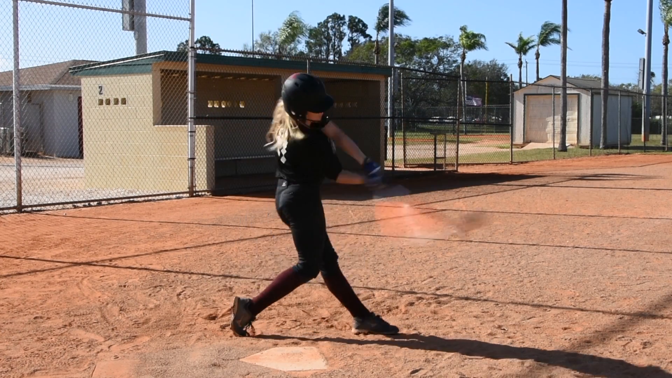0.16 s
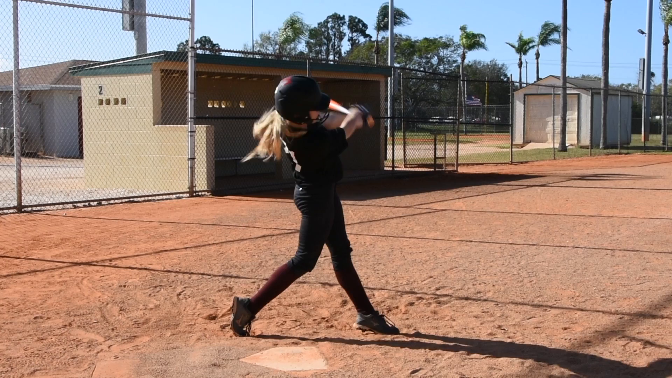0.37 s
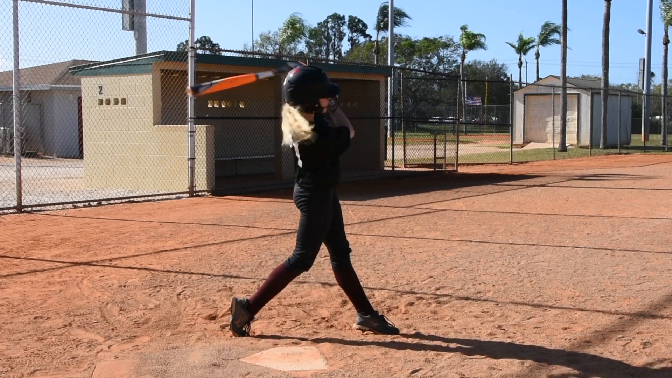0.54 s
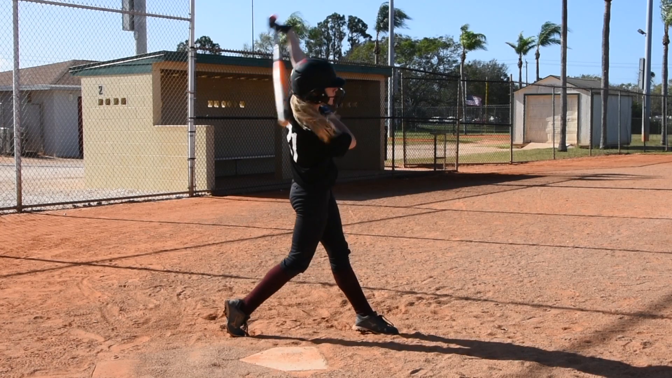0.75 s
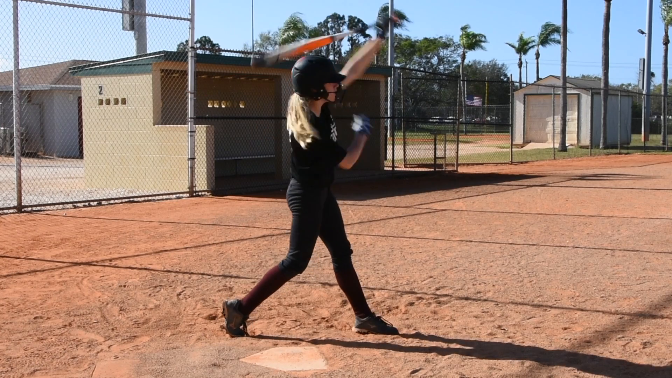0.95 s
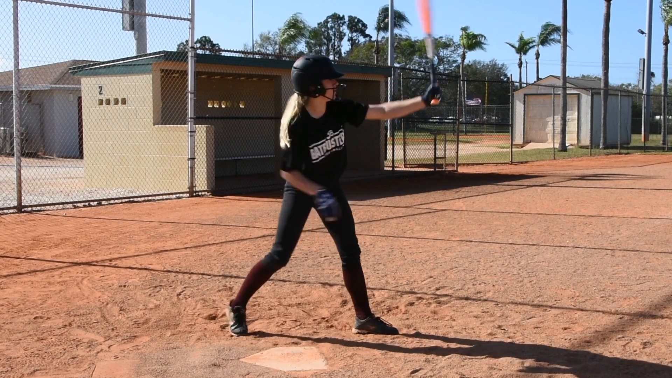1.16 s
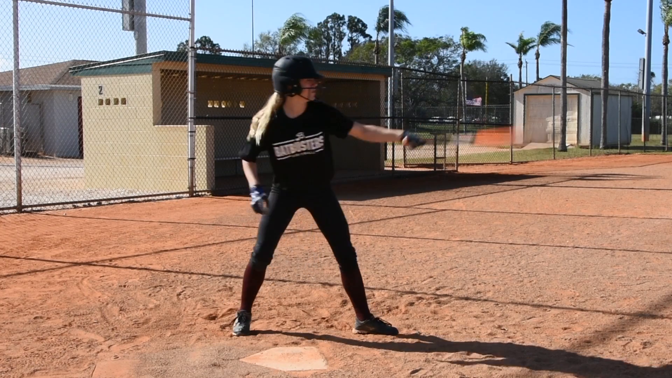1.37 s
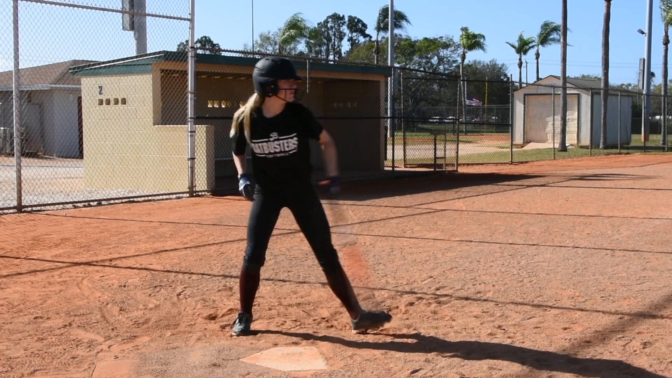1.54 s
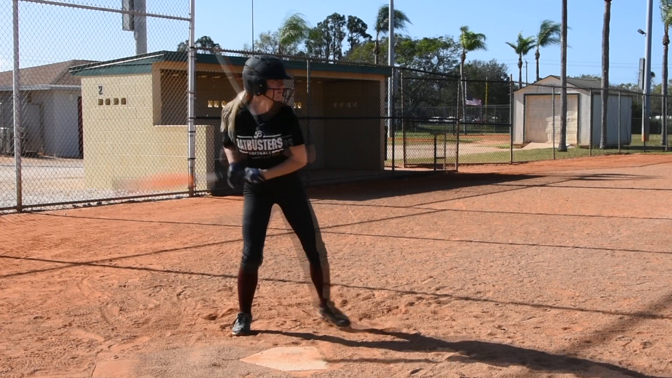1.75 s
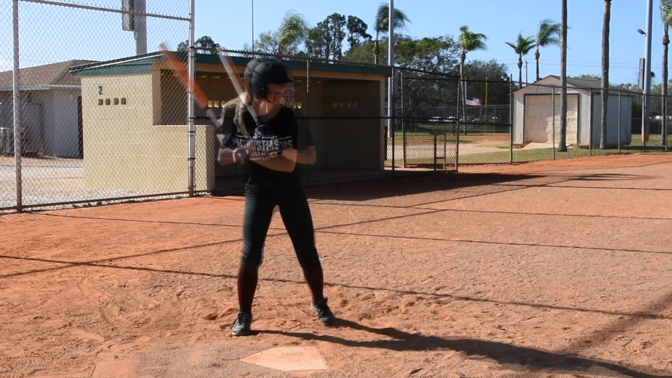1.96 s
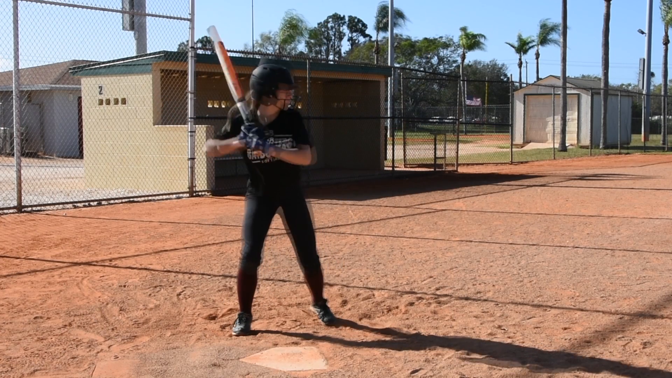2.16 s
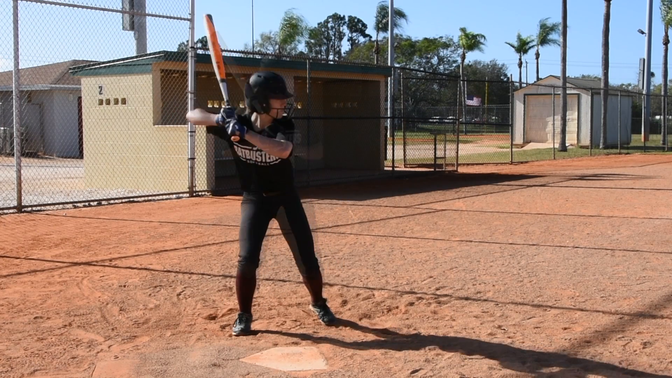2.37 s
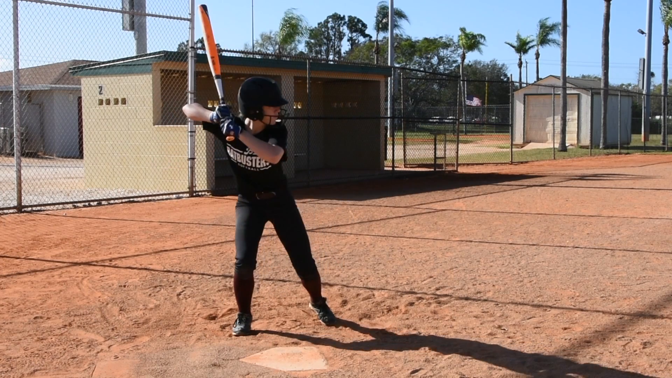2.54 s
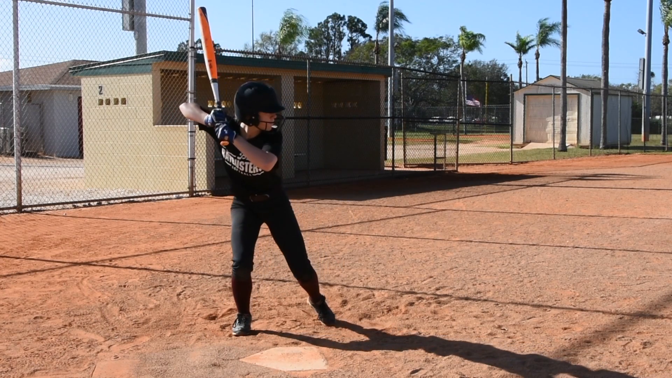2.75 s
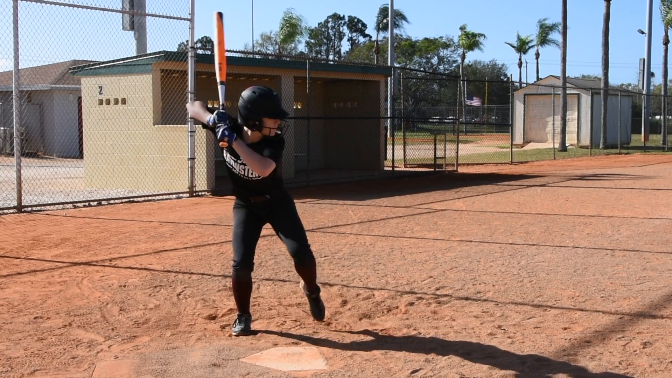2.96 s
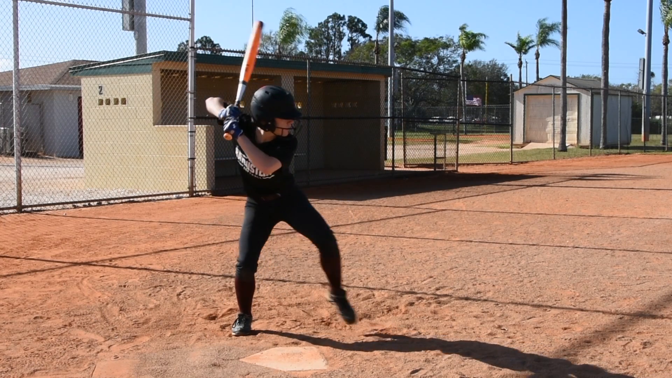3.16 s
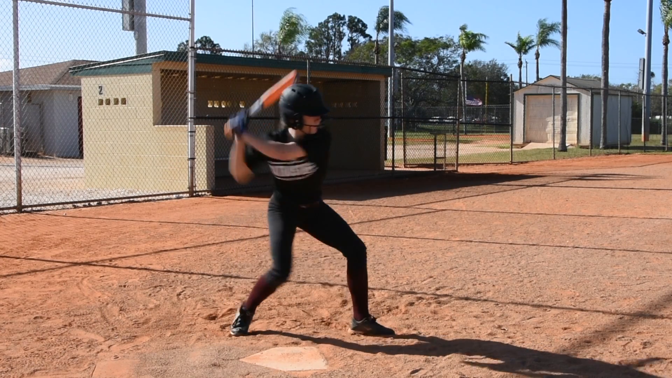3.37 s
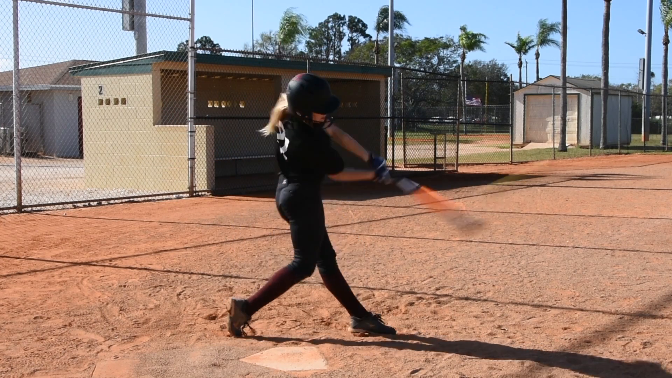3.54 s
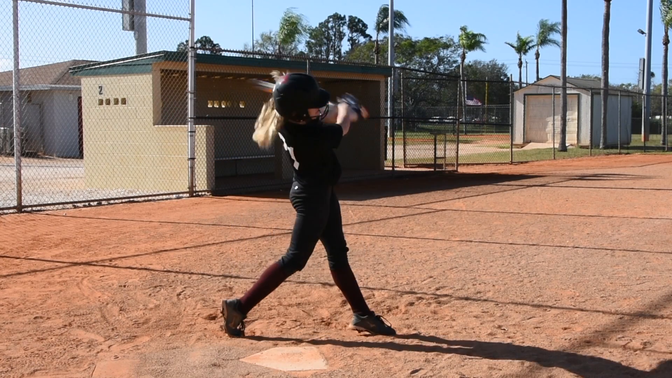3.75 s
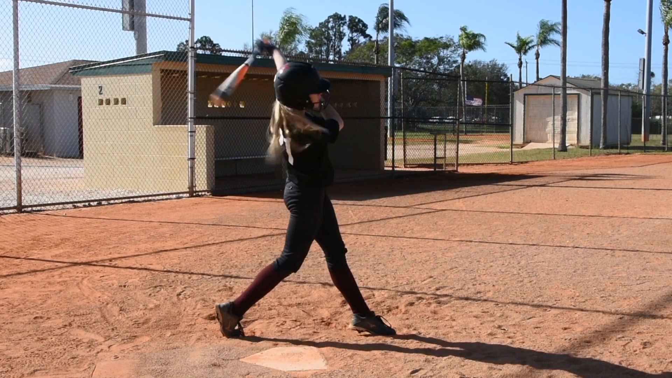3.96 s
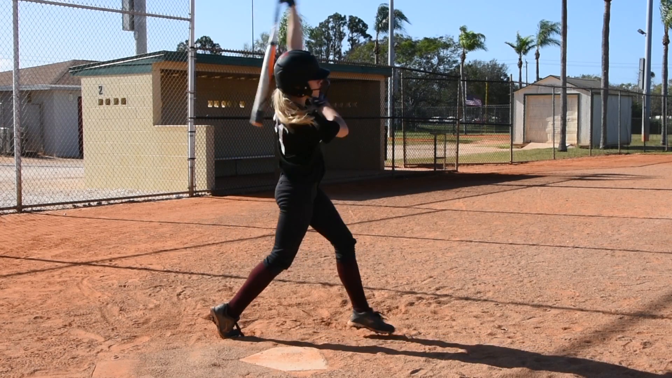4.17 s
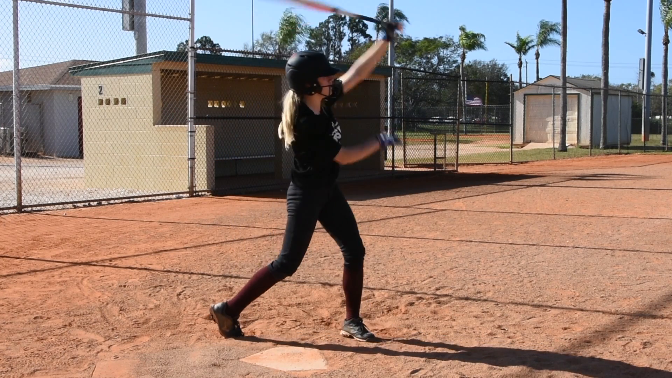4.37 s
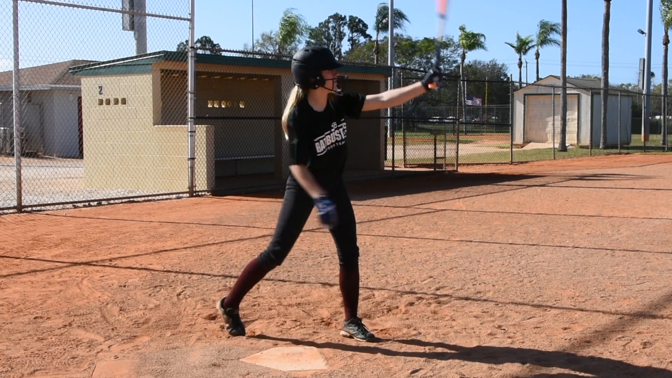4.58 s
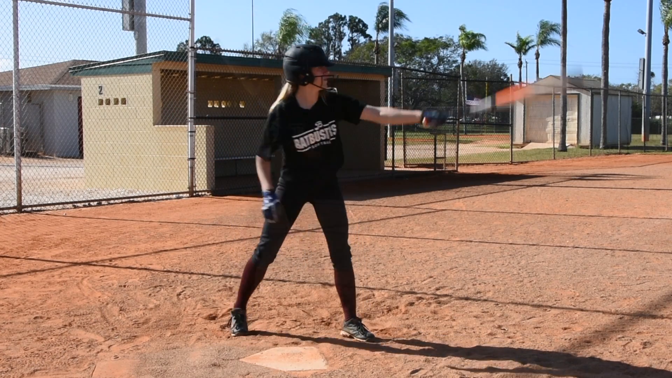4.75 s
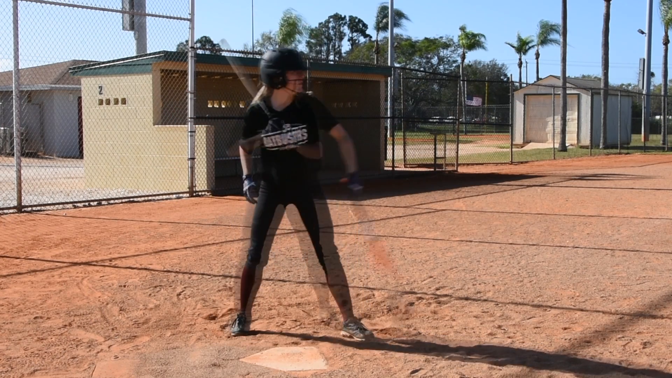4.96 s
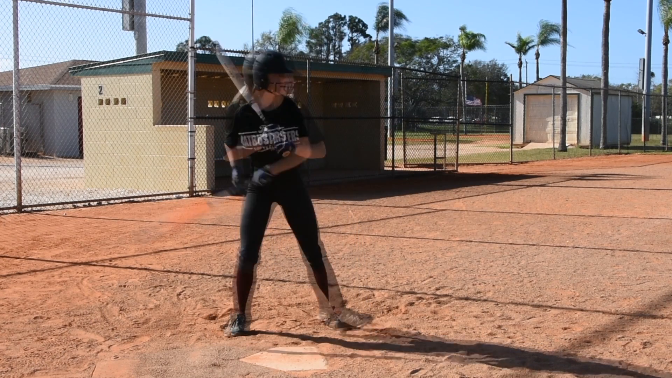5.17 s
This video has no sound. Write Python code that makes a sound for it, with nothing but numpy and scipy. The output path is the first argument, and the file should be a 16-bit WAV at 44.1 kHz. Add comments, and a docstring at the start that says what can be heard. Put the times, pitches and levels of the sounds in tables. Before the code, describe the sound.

Two sharp, briefly ringing bat hits on a ball echo outdoors over the steady low hum of a distant engine.

```python
"""A softball bat, close to the microphone, hits twice on an open practice field. Each contact is a hard
crack with a short ring of the hollow barrel; it overloads the microphone and slaps back from dugout,
fences and sheds. Shoes scuff the dirt before each swing. Some way off an eight-cylinder engine drones,
gains speed and eases off. Behind it lie a far bird, a soft outdoor hiss and faint electronic pips."""
import sys
import numpy as np
from scipy import signal
from scipy.fft import rfft, irfft
from scipy.io import wavfile

SR = 44100
rng = np.random.default_rng(int(sys.argv[2]) if len(sys.argv) > 2 else 0)


def log_audio(samples):
    """Write samples as a 16-bit WAV file to the path given in sys.argv[1]."""
    # one column per channel
    frames = np.atleast_2d(samples).T
    # limit to full scale, then quantise
    limited = np.clip(frames, -1, 1)
    pcm = np.round(limited * 32767).astype(np.int16)
    wavfile.write(sys.argv[1], SR, pcm)


N = 230017
TIME = np.arange(N) / SR


# swings at the plate: t/s, strength/dB, barrel ring/dB, ring length factor, crackle/dB, knock/dB
HITS = [(0.2731, -2, 0, 1.0, 5.5, 0), (3.6318, -1, -5, 0.67, 1, -1)]
def bat(outgoing_db=20):
    """Each blow reaches the microphone directly; its crack and a little ring return from the field."""
    out, response, t = np.zeros((2, N)), field(), TIME[:SR // 4]
    for s, db, ring_db, length, crackle_db, knock_db in HITS:
        near_ring, carried_ring = from_db(ring_db) * barrel_ring(t, length)
        direct = contact(t, crackle_db, knock_db) + near_ring
        outgoing = from_db(outgoing_db) * (t == 0) + carried_ring
        add(out, from_db(db) * direct, s)
        add(out, from_db(db) * signal.fftconvolve(outgoing[None], response, axes=1), s)
    return out


# modes of ball and bat wall as they squash: f/Hz, relative level/dB, t60/s
KNOCK_MODES = [(276, -32, 0.026), (505, -14.5, 0.041), (630, -2, 0.019), (849, -1.5, 0.018),
               (1093, -3, 0.02), (1270, 3.5, 0.0094), (1560, 7.5, 0.0073), (1805, -7.5, 0.039)]
# splintery noise of the contact: f/Hz, relative density/dB
CRACKLE_SPECTRUM = [(300, 4.5), (1000, 8.5), (2000, -1), (3000, -3), (5500, -12), (9000, -19), (13000, -22),
                    (16000, -26)]
def contact(t, crackle_db, knock_db, snap_db=6.5, snap_s=.000021, crackle_t60=.029, ground_s=.0044):
    """Ball on bat at close range: a steep pressure snap, a knock, crackle, and their bounce off dirt."""
    port_lag_s = np.array([[0], [.000012]])  # the snap reaches one microphone port just after the other
    u = (t - port_lag_s) / snap_s - 4
    snap = -from_db(snap_db) * u * np.exp((1 - u * u) / 2)
    knock = from_db(knock_db) * modes(KNOCK_MODES, t)
    crackle = from_db(crackle_db - 8 - 60 * t / crackle_t60) * noise(CRACKLE_SPECTRUM, len(t))
    blow = snap + knock + crackle
    bounce = np.pad(blow, ((0, 0), (round(ground_s * SR), 0)))[:, :len(t)]
    return blow + from_db(-6) * bounce


# modes of the hollow barrel: f/Hz, relative level/dB, t60/s, gain out into the field/dB
BARREL_MODES = [(1341, -5, .135, -19), (1667, -3, .075, -18), (2412, -12.5, .11, -9), (3160, -24, .04, -10),
                (5146, -30, .035, -10)]
def barrel_ring(t, length):
    """The struck barrel rings briefly: once as heard at the plate, once as carried into the field."""
    carried = [(hz, db + outward_db, t60) for hz, db, t60, outward_db in BARREL_MODES]
    return np.array([modes(BARREL_MODES, t, length), modes(carried, t, length)])


# dugout, fences and sheds, heard from the plate:
# delay/s, level/dB, smear/s, low edge/Hz, high edge/Hz, treble above that edge/dB
WALL_ECHOES = [(.0200, -13, .0002, 900, 3000, -16), (.0282, 0, .001, 1283, 2600, -34),
               (.0708, -11.5, 0.00038, 700, 3000, -8.5), (0.1002, -7.5, 0.00032, 337.3, 3600, -8),
               (0.1294, -5, 0.0018, 2600, 4970, -32), (.1310, -8, 0.00085, 950, 1630, -16.5),
               (.1570, -27.5, 0.0018, 1500, 4000, -12), (.1730, -23.5, 0.0032, 1076, 3200, -14),
               (.2040, -24.5, 0.00043, 1202, 3500, -13.5), (0.2772, -30.5, 0.003, 2000, 3470, -15)]
def field(air_hz=16000, air_s=.15):
    """Impulse response of the field: backstop, scatter, and slaps that the air dulls with distance."""
    t = TIME[:SR * 3 // 4]
    response = backstop(t) + scatter(t)
    for delay, db, *surface in WALL_ECHOES:
        cutoff_hz = air_hz / np.sqrt(1 + delay / air_s)
        air = signal.butter(2, cutoff_hz, fs=SR, output="sos")
        add(response, from_db(db) * signal.sosfilt(air, slap(*surface)), delay)
    return response


def slap(smear_s, low_hz, high_hz, treble_db, trail_db=-10, trail_s=.011):
    """A wall's reply: full body and thinner top, spread by its ragged face and trailed by its edges."""
    t = TIME[:SR // 30]
    face, edges = rng.standard_normal((2, len(t))) * np.exp(-t / np.array([[smear_s], [trail_s]]))
    spread = face / np.linalg.norm(face) + from_db(trail_db) * edges / np.linalg.norm(edges)
    body = band(spread, low_hz, high_hz, order=3)
    return body + from_db(treble_db) * band(spread, high_hz, 8900, order=1)


# splash off the backstop: f/Hz, relative density/dB
BACKSTOP_SPECTRUM = [(200, -33.5), (500, 0), (1200, 3.5), (2000, -1), (2700, -0.5), (6000, -7.5),
                     (10000, -11.5), (16000, -29)]
BUILD_UP_S = .071  # time for diffuse sound to gather
def backstop(t, level_db=-40, delay_s=.031, tail_t60=.11):
    """The nearby backstop throws back a noisy splash with a short tail."""
    splash = swell(delay_s, half_s=.0083)[:len(t)]
    tail = from_db(-60 * t / tail_t60) * np.minimum(t / BUILD_UP_S, 1)
    return from_db(level_db) * (splash + tail) * noise(BACKSTOP_SPECTRUM, len(t))


# wire fence and trees around the field: f/Hz, relative level/dB, t60/s
SCATTER_BANDS = [(200, -3.5, 0.73), (600, 7, 0.38), (1410, 0, 0.67), (2000, -2, 0.55), (3000, -5.5, 0.92),
                 (4000, -14, 0.88), (5570, -11, 0.7), (10000, -16.5, 0.47), (16100, -18.5, .32)]
def scatter(t, level_db=-37, rattle_db=2):
    """A diffuse tail, each band dying at its own rate; posts and trunks answer in rattling clumps."""
    clumps = from_db(rattle_db * drift(83)[:len(t)])
    white = [noise([(20, 0), (20000, 0)], len(t)) * clumps for _ in range(2)]
    edges = np.geomspace(150, 18000, 15)
    tail = 0
    for k, (low_hz, high_hz) in enumerate(zip(edges, edges[1:])):
        hz = np.sqrt(low_hz * high_hz)
        t60 = at_hz(SCATTER_BANDS, hz, column=2)
        fade = from_db(level_db + at_hz(SCATTER_BANDS, hz) - 60 * t / t60)
        tail += band(white[k % 2], low_hz, high_hz) * fade
    return tail * np.minimum(t / BUILD_UP_S, 1)


# the batter's shoes and clothes, near the microphone: t/s, level/dB, half length/s
SCUFFS = [(0.057, -41, 0.01), (0.103, -46.5, 0.013), (0.174, -34, 0.0083), (0.188, -37, 0.005),
          (0.227, -33, 0.0025), (1.198, -31, 0.003), (1.543, -48, 0.021), (1.688, -49.5, 0.022),
          (3.358, -45.5, 0.011), (3.406, -51, 0.018), (3.441, -40, 0.01), (3.506, -48.5, 0.021)]
# colour of the rubbing: f/Hz, relative density/dB
SCUFF_SPECTRUM = [(400, -3), (900, -0.5), (1500, 10.5), (2250, 10), (2900, -20), (5000, -21.5),
                  (15000, -37.5)]
def scuffs(grit_db=3):
    """The batter steps and turns: short rubs, broken up by grains of dirt."""
    rubs = sum(from_db(db) * swell(s, half_s) for s, db, half_s in SCUFFS)
    return noise(SCUFF_SPECTRUM) * rms_one(from_db(grit_db * drift(170))) * rubs


# the engine gains speed, holds it and eases off: t/s, firing rate/Hz, firing tone level/dB
ENGINE_RUN = [(0.0, 128.8, -24), (0.09, 129.8, -29), (0.52, 137.6, -24.5), (0.77, 140.9, -31),
              (0.99, 141.6, -28), (1.9, 155.6, -33.5), (2.0, 166.7, -34.5), (2.19, 171.1, -34.5),
              (2.41, 171.4, -38), (2.47, 174.4, -37.5), (2.63, 172.4, -25.5), (3.57, 174.5, -23),
              (3.92, 178.4, -28), (4.35, 178.6, -20), (4.5, 178.4, -27.5), (4.69, 177.8, -24.5),
              (4.89, 174.7, -30), (5.21, 156.7, -33)]
# deep boom on the fifth order: t/s, relative level/dB
BOOM_LEVEL = [(0.0, -60), (0.04, -43), (2.18, -39.5), (2.9, -52), (3.09, -31), (4.5, -32.5), (5.17, -37.5),
              (5.21, -42)]
# uneven firing around the main tone: order, level at low revs/dB, level at high revs/dB
UNEVEN_ORDERS = [(3, -58.5, -53.5), (4, -44.5, -60), (6, -45, -35.5), (7, -53.5, -45.5), (9, -51, -41.5),
                 (10, -51, -47)]
def engine(cylinders=8, low_revs_hz=134.4, high_revs_hz=172.4, flutter_db=1.04, waver_db=2):
    """Some way off, eight firings a cycle make the main tone; unequal cylinders add orders around it."""
    firing_hz, firing_db = in_time(ENGINE_RUN)
    boom_db, = in_time(BOOM_LEVEL)
    cycle_hz = firing_hz / cylinders
    angle = 2 * np.pi * np.cumsum(cycle_hz) / SR
    revs = np.clip((firing_hz - low_revs_hz) / (high_revs_hz - low_revs_hz), 0, 1)
    hum = order_tone(angle, cylinders, firing_db + flutter_db * drift(11))
    hum += order_tone(angle, 5, boom_db - 1)
    for order, slow_db, fast_db in UNEVEN_ORDERS:
        hum += order_tone(angle, order, slow_db + revs * (fast_db - slow_db) + waver_db * drift(3))
    return hum + exhaust(angle, cycle_hz, revs, waver_db) + rumble()


def order_tone(angle, order, db):
    """A sine at the nearest whole multiple of the engine cycle, with its rms level in dB."""
    return np.sqrt(2) * from_db(db) * np.sin(round(order) * angle + rng.uniform(0, 2 * np.pi))


# all exhaust overtones together: t/s, level/dB
EXHAUST_LEVEL = [(0.0, -43), (0.23, -42), (1.32, -50), (1.94, -49), (2.47, -41), (2.79, -42.5), (3.89, -41),
                 (4.34, -45), (5.21, -44)]
# single overtones: order (sounded at the nearest whole one), gain at low revs/dB, gain at high revs/dB
EXHAUST_ORDERS = [(11.23, -14.5, -11), (12, -22, -8.5), (12.505, -12, -3.5), (13.88, -8.5, -7.5),
                  (15, -8, -5), (16.487, 0, -9.5), (17, -26.5, -9), (18, -31, -16), (19, -24, -15),
                  (20.4, -21.5, -15), (21.8, -15.5, -19)]
# response of the exhaust pipe: f/Hz, gain/dB
PIPE_RESPONSE = [(180, -16), (240, 3), (300, 1.5), (340, -6), (420, -2.5), (500, 1.5)]
def exhaust(angle, cycle_hz, revs, waver_db, gain_db=.5):
    """Wavering overtones slide through the pipe's resonances as the engine speed changes."""
    level_db, = in_time(EXHAUST_LEVEL)
    out = 0
    for order, slow_db, fast_db in EXHAUST_ORDERS:
        colour_db = slow_db + revs * (fast_db - slow_db) + at_hz(PIPE_RESPONSE, order * cycle_hz)
        out += order_tone(angle, order, level_db + gain_db + colour_db + waver_db * drift(6.2))
    return out


# combustion noise: f/Hz, relative density/dB
RUMBLE_SPECTRUM = [(20, -15), (35, -10), (60, -2.5), (90, 0.5), (130, -2.5), (180, -7), (240, -10),
                   (300, -14.5), (380, -32.5), (500, -45)]
def rumble(level_db=-36):
    """Rough combustion lays a steady low noise under the engine's tones."""
    return from_db(level_db) * band(noise(RUMBLE_SPECTRUM), 26, 580)


# whistles of a far bird: t/s, half length/s, f/Hz, glide/(Hz/s), level/dB
BIRD_NOTES = [(2.0, .025, 3800, 1, -61), (2.07, 0.029, 3600, -700, -60.5), (2.135, 0.03, 3800, 303, -62),
              (2.3, 0.019, 4214, 600, -62.5)]
def bird(linger_db=-10, linger_s=.23):
    """Thin stepped whistles in the distance, each lingering among the trees."""
    out = 0
    for s, half_s, hz, glide, db in BIRD_NOTES:
        t = TIME - s
        note = swell(s, half_s) * np.sin(2 * np.pi * (hz + glide * t / 2) * t)
        linger = swell(s + linger_s, linger_s) * drift(22) * np.sin(2 * np.pi * hz * t)
        out += from_db(db) * (note + from_db(linger_db) * linger)
    return out


# hiss of the open field: f/Hz, relative density/dB
HISS_SPECTRUM = [(210, -30), (350, -9), (438, -5.5), (584, -11), (707, -9.5), (959, -14), (1200, -11),
                 (2170, -20), (3340, -30), (3730, -29), (5480, -37), (10200, -44), (16000, -49)]
# rise and fall of that hiss: t/s, relative level/dB
HISS_LEVEL = [(0.0, -51.5), (0.2, -51.5), (0.64, -56), (1.2, -54), (2.07, -57), (2.96, -53.5), (3.26, -54),
              (3.71, -52), (5.21, -55.5)]
def outdoor_hiss(middle_db=3, treble_db=-10, split_hz=3000):
    """Far traffic and leaves hiss softly around the field, rising and falling together."""
    level_db, = in_time(HISS_LEVEL)
    low = signal.sosfilt(signal.butter(2, split_hz, fs=SR, output="sos"), noise(HISS_SPECTRUM))
    high = signal.sosfilt(signal.butter(2, split_hz, "high", fs=SR, output="sos"), noise(HISS_SPECTRUM))
    low *= from_db(middle_db) / band(low, 440, 2500).std()
    high *= from_db(treble_db) / band(high, 4300, 22000).std()
    return from_db(level_db) * (low + high)


# pips of electronics near the microphone: t/s
PIP_TIMES = [.91, 1.41, 1.91, 2.36, 2.86, 3.36, 3.40, 4.371, 4.87]
def electronics(upper_db=-65, lower_db=-69):
    """Very faint, brief bursts of a high two-tone whine."""
    gate = sum(swell(s, half_s=.0053) for s in PIP_TIMES)
    upper = from_db(upper_db) * np.sin(2 * np.pi * 10000 * TIME)
    lower = from_db(lower_db) * np.sin(2 * np.pi * 7500 * TIME)
    return gate * (upper + lower)


# diffuse sound at the two sides of the microphone: f/Hz, likeness (0-1)
STEREO_LIKENESS = [(100, 1), (1500, .998), (3000, .985), (6000, .92), (9000, .78), (16000, .75)]
def noise(spectrum, size=N):
    """Stereo noise of a given colour, nearly the same on both sides in the bass; rms 1."""
    hz = np.fft.rfftfreq(size, 1 / SR)
    alike = np.clip(at_hz(STEREO_LIKENESS, hz), 0, 1)
    mid, side = rfft(rng.standard_normal((2, size))) * from_db(at_hz(spectrum, hz))
    return rms_one(irfft(np.sqrt(1 + alike) * mid + np.sqrt(1 - alike) * side * [[1], [-1]], size))


def modes(table, t, length=1):
    """Struck modes as decaying sines, neighbours starting in opposite directions."""
    return sum((-1) ** k * from_db(db - 60 * t / (t60 * length)) * np.sin(2 * np.pi * hz * t)
               for k, (hz, db, t60, *_) in enumerate(table))


def drift(rate_hz):
    """Smooth random wander with rms 1, drawn every 40 samples."""
    pole = np.exp(-80 * np.pi * rate_hz / SR)
    slow = signal.lfilter([1], [1, -2 * pole, pole * pole], rng.standard_normal(N // 40 + 2002))[2000:]
    return np.interp(np.arange(N) / 40, np.arange(len(slow)), rms_one(slow))


def band(x, low_hz, high_hz, order=2):
    """Causal band-pass."""
    edges = [low_hz, np.clip(high_hz, low_hz * 1.05, .47 * SR)]
    return signal.sosfilt(signal.butter(order, edges, "band", fs=SR, output="sos"), x + 1e-18)


def swell(s, half_s):
    """A bell-shaped rise and fall around a moment."""
    return np.exp(-.5 * ((TIME - s) / half_s) ** 2)


def add(out, x, s):
    """Mix a short sound in at a given time."""
    i = round(s * SR)
    out[:, i:i + x.shape[-1]] += x[..., :N - i]


def in_time(rows):
    """Each column of a curve at every sample."""
    s, *columns = np.transpose(rows)
    return [np.interp(TIME, s, c) for c in columns]


def at_hz(points, hz, column=1):
    """Read a column of a spectrum on a log-frequency axis."""
    points = np.array(points)
    return np.interp(np.log(hz + 1e-9), np.log(points[:, 0]), points[:, column])


def from_db(db):
    """Decibels to gain."""
    return 10 ** (np.asarray(db) / 20)


def rms_one(x):
    """Scale to unit rms."""
    return x / np.sqrt(np.mean(x ** 2) + 1e-20)


def scene(left_db=1.3, right_db=-1.61):
    """The field from beside the plate; everything reaches the left channel a little louder."""
    mix = bat() + engine() + outdoor_hiss() + bird() + scuffs() + electronics()
    return mix * from_db([[left_db], [right_db]])


def record(dry, ceiling=.97, cutoff_hz=16300):
    """The close cracks overload the microphone input; a steep low-pass cuts the top."""
    clipped = np.clip(dry, -ceiling, ceiling)
    return signal.sosfilt(signal.ellip(12, .1, 90, cutoff_hz, fs=SR, output="sos"), clipped)


dry = scene()
out = record(dry)
log_audio(out)
```